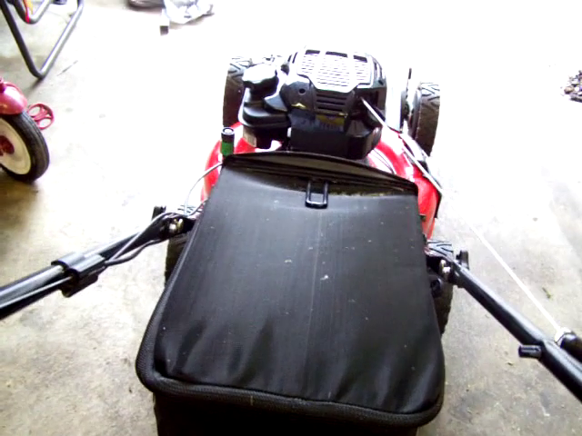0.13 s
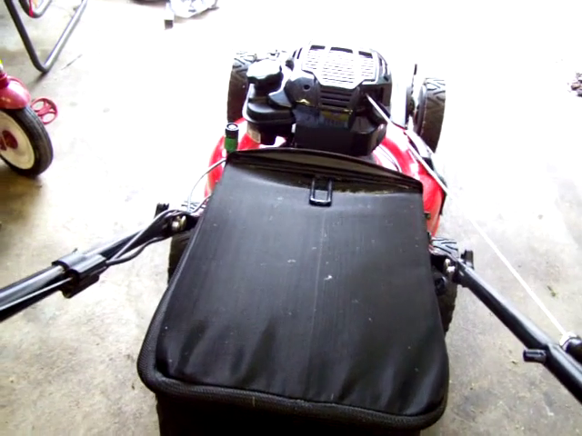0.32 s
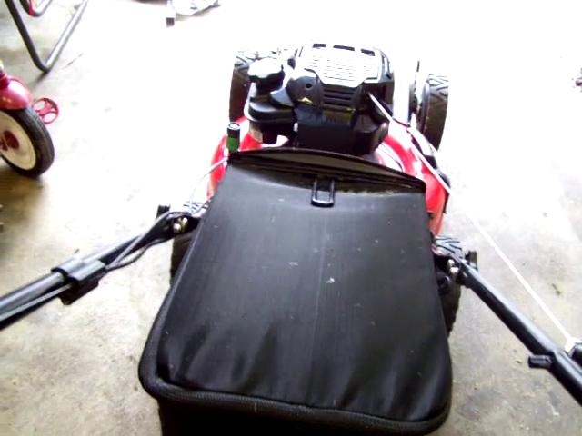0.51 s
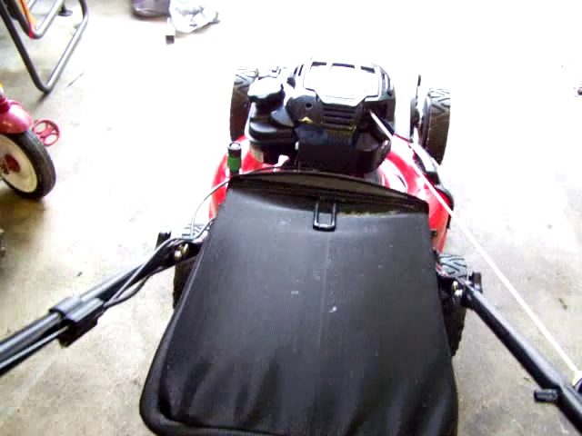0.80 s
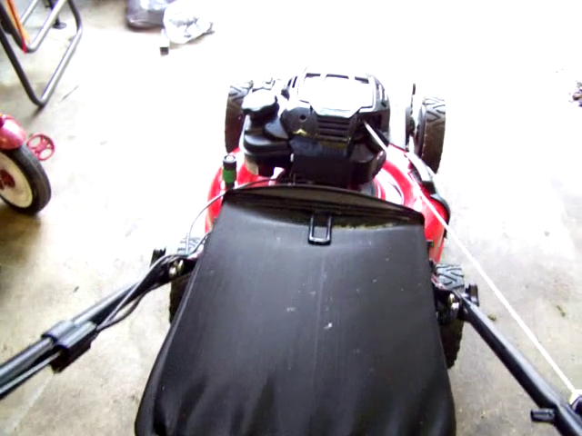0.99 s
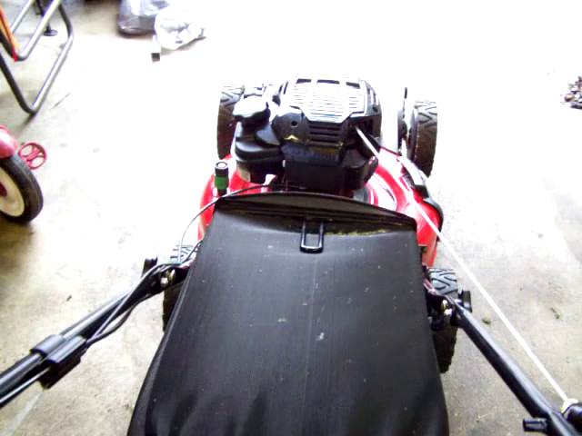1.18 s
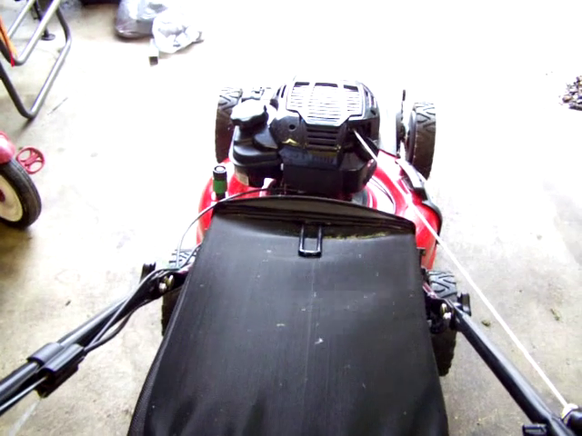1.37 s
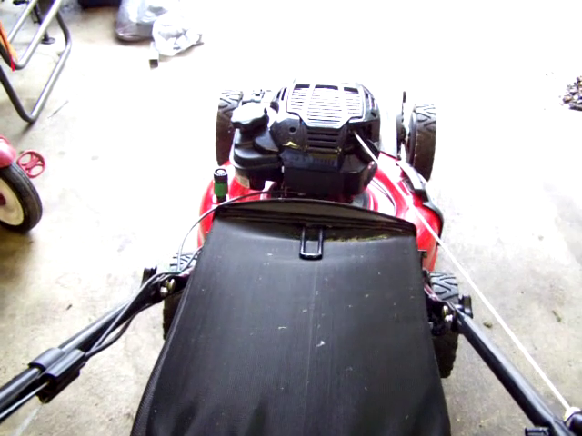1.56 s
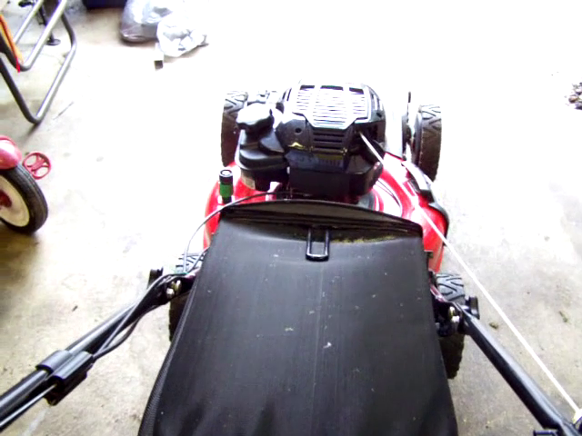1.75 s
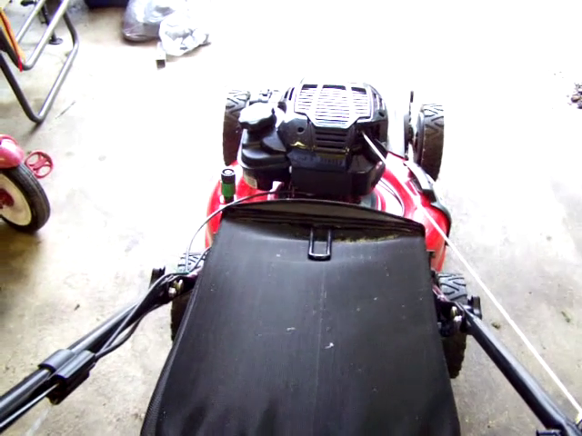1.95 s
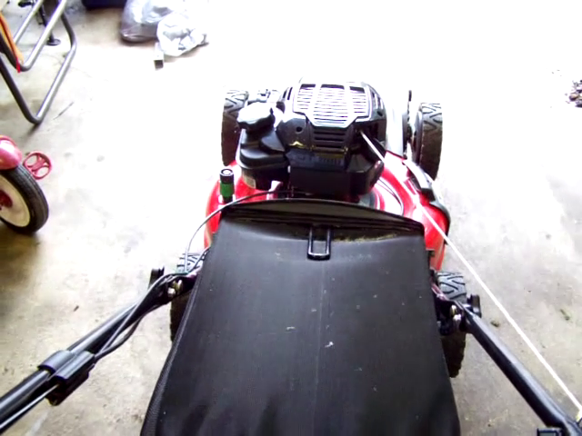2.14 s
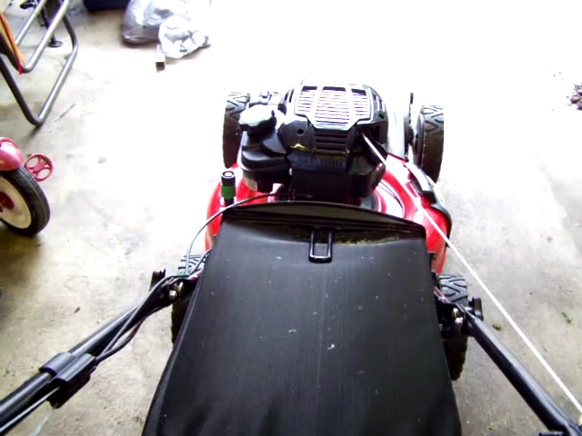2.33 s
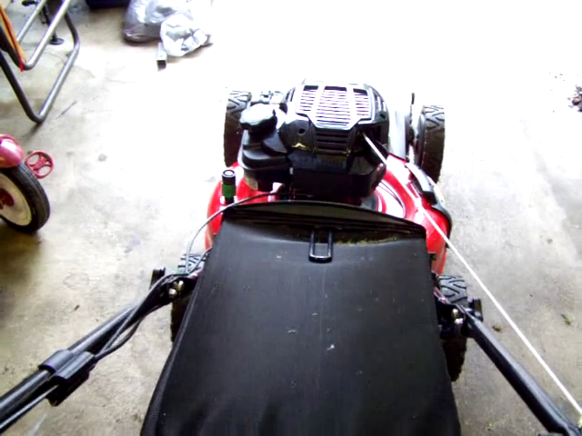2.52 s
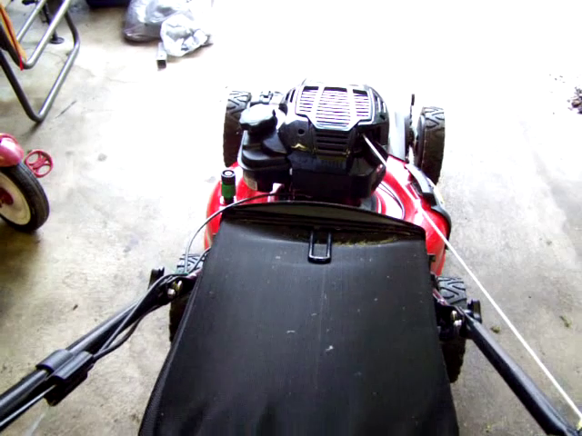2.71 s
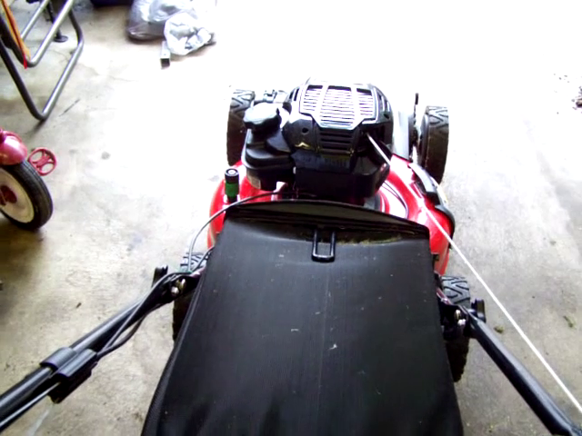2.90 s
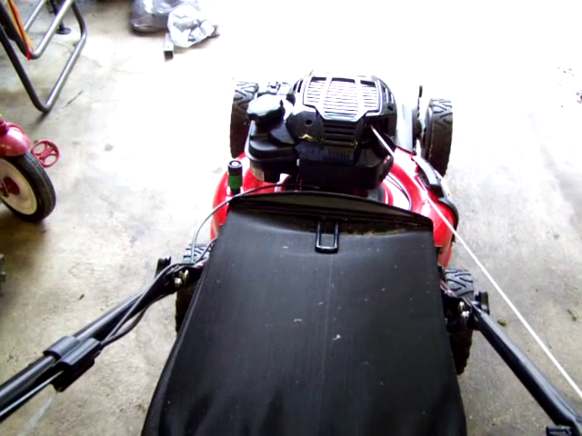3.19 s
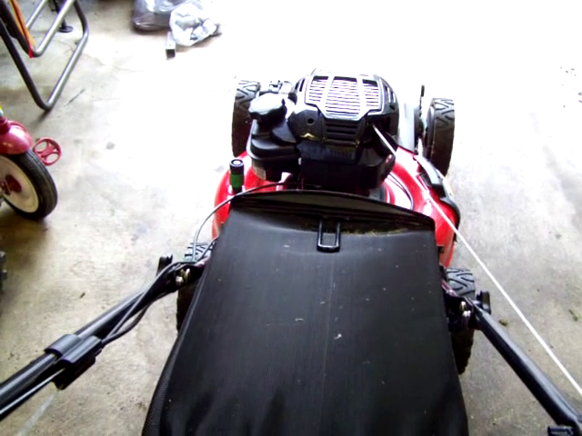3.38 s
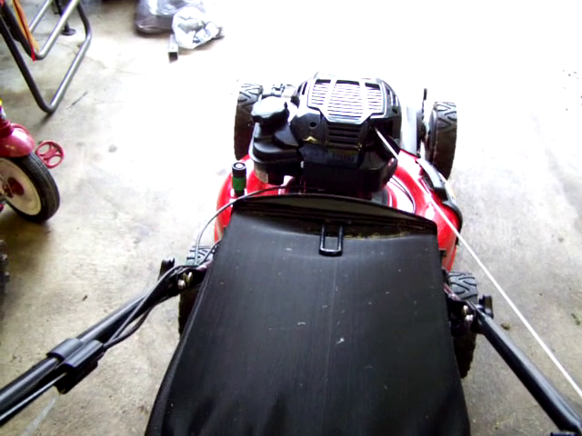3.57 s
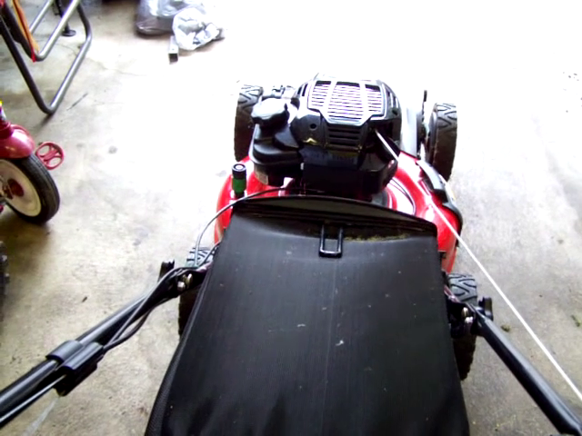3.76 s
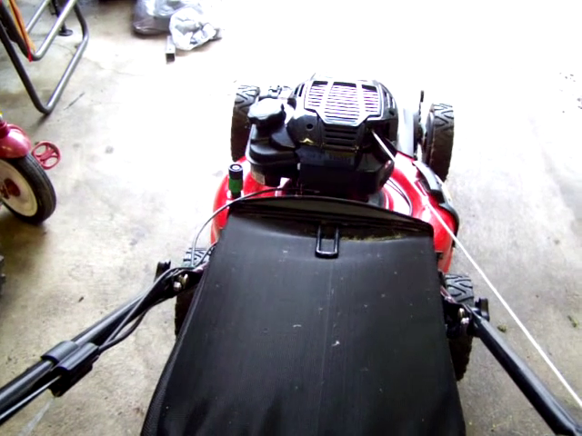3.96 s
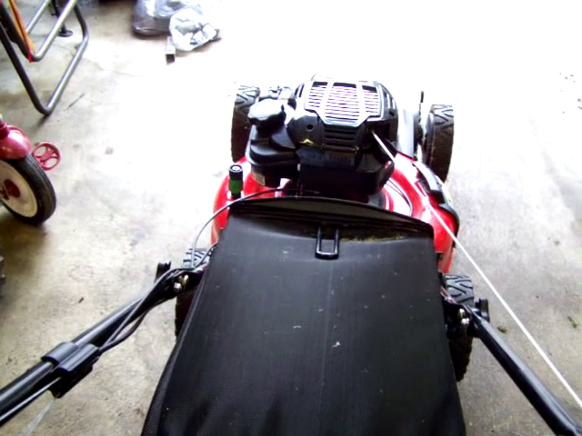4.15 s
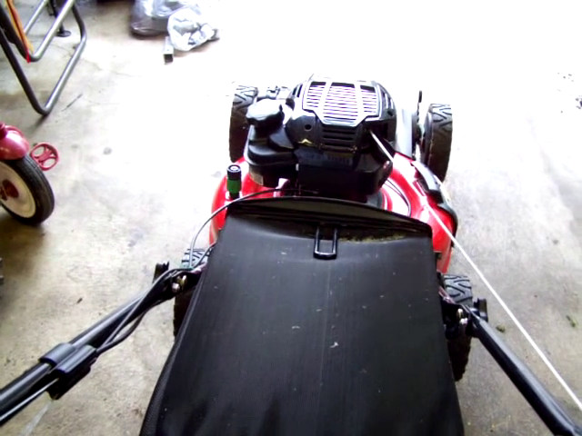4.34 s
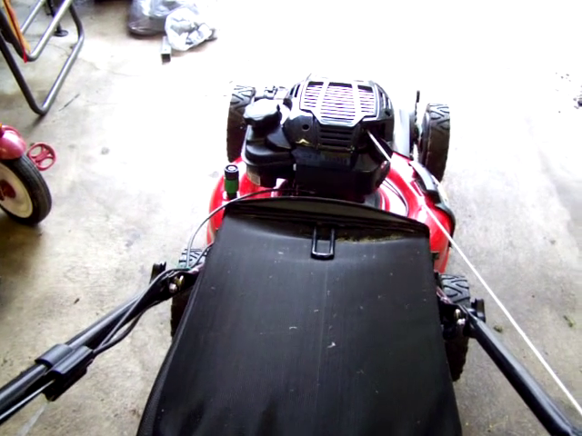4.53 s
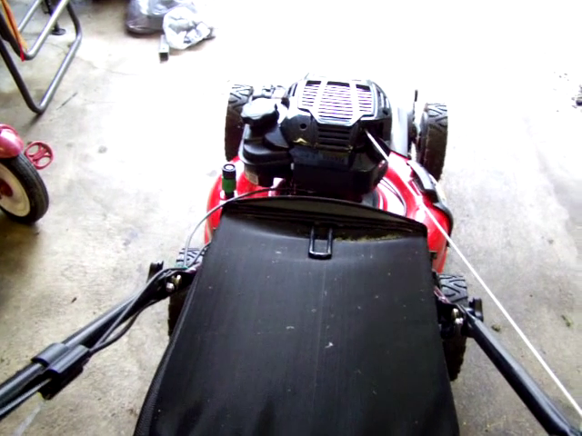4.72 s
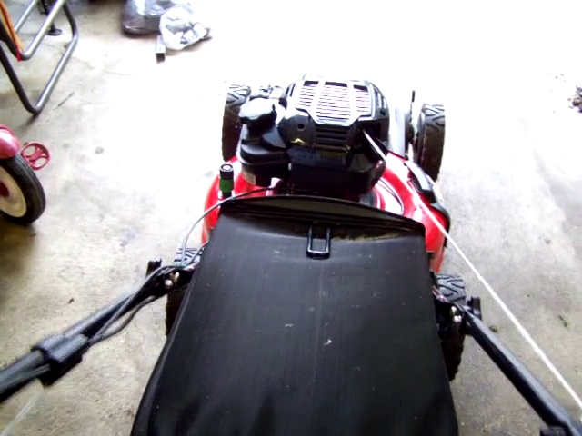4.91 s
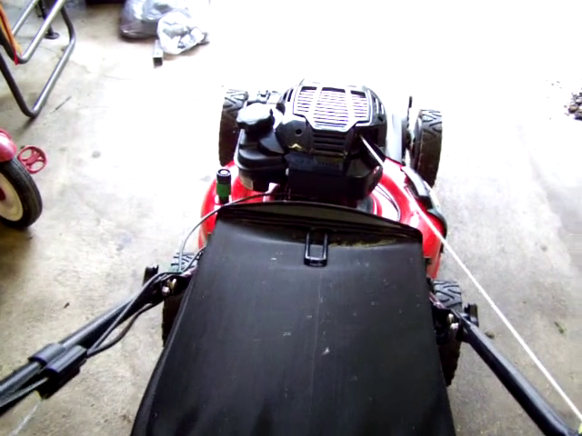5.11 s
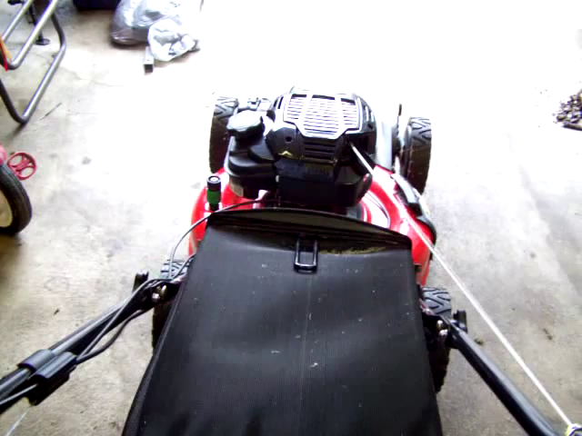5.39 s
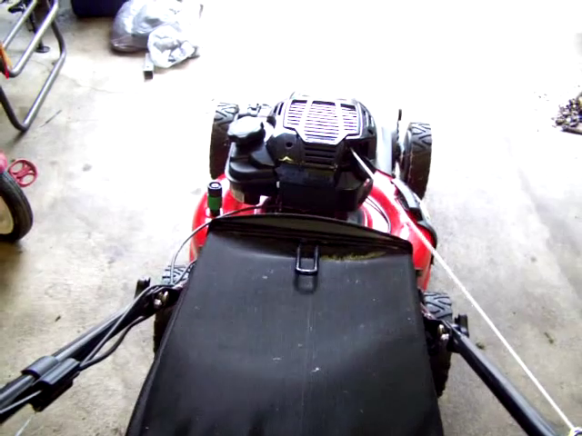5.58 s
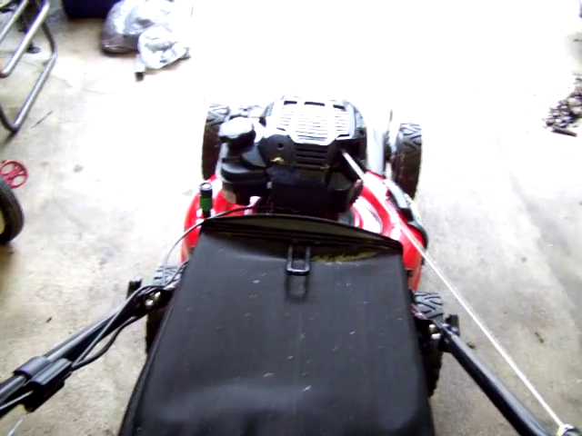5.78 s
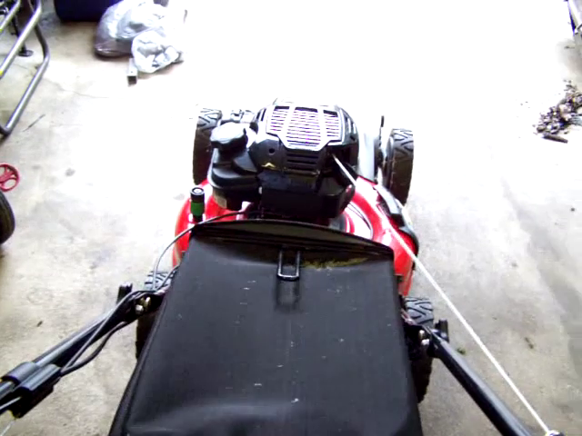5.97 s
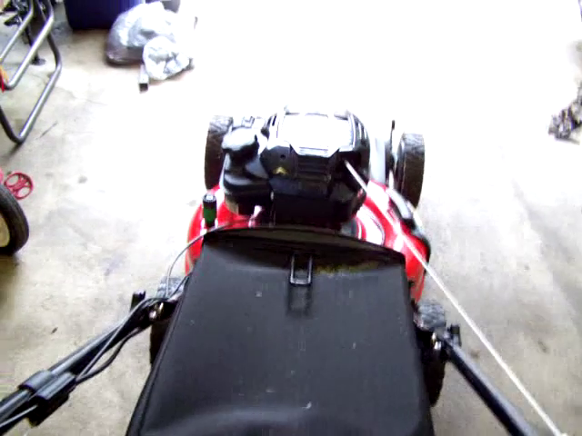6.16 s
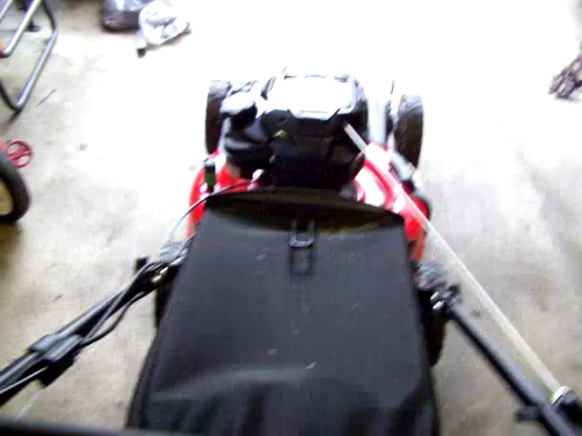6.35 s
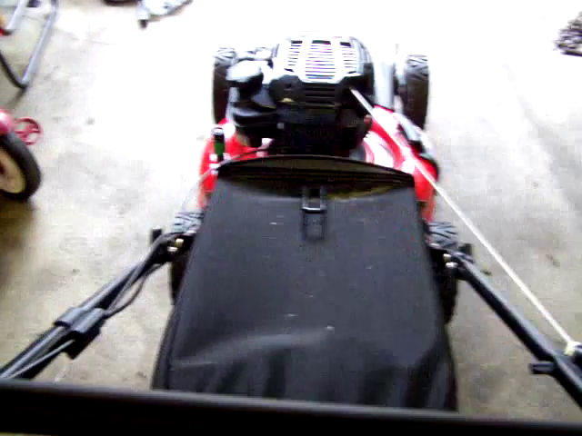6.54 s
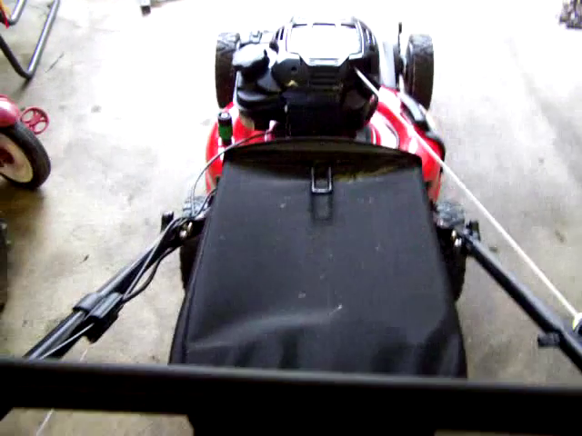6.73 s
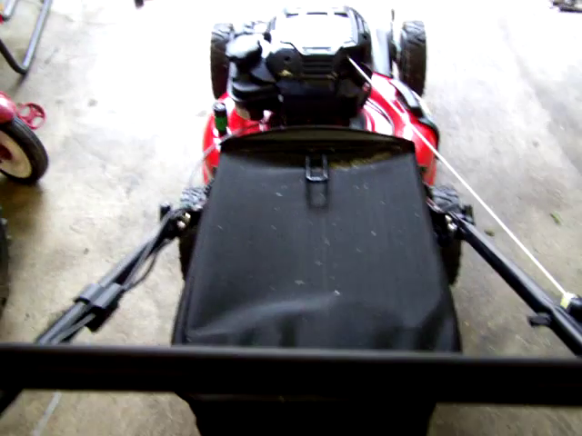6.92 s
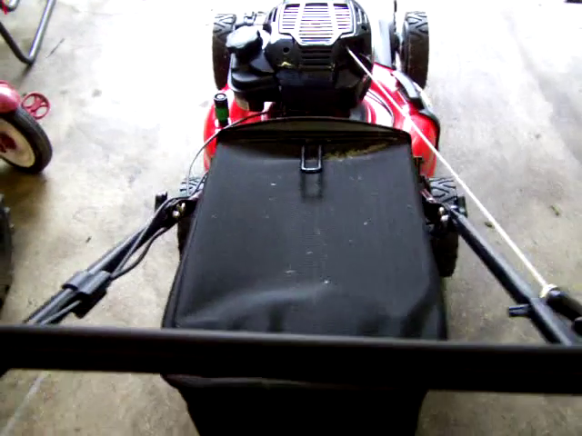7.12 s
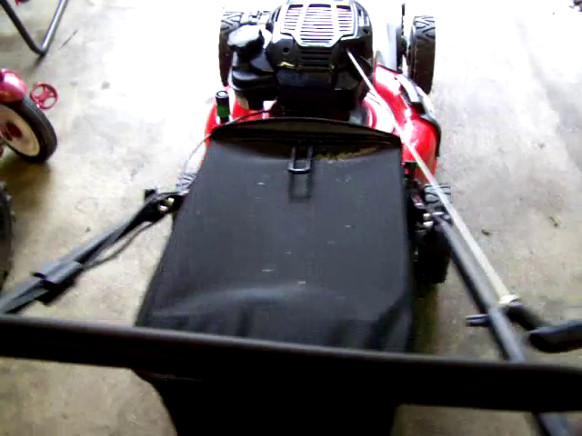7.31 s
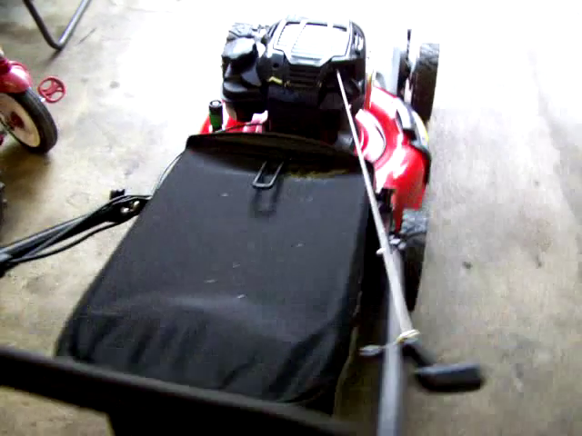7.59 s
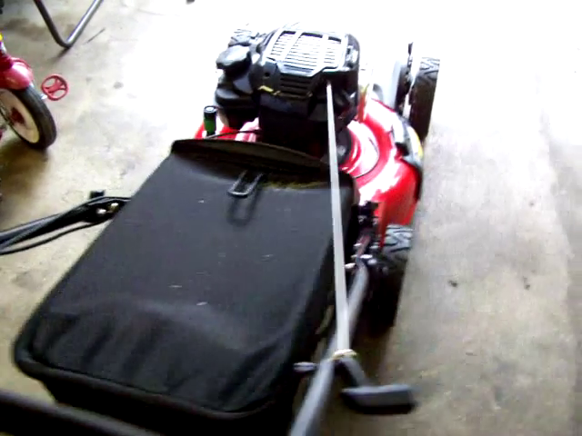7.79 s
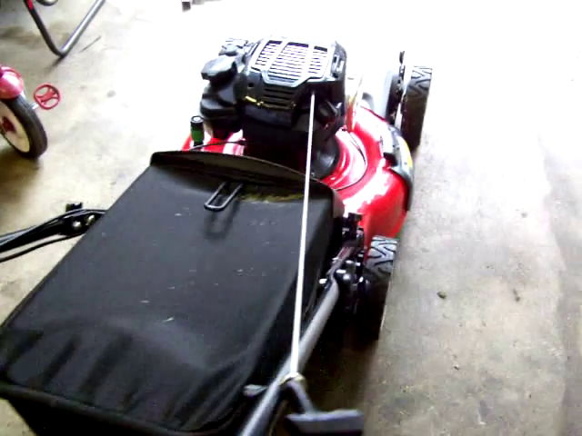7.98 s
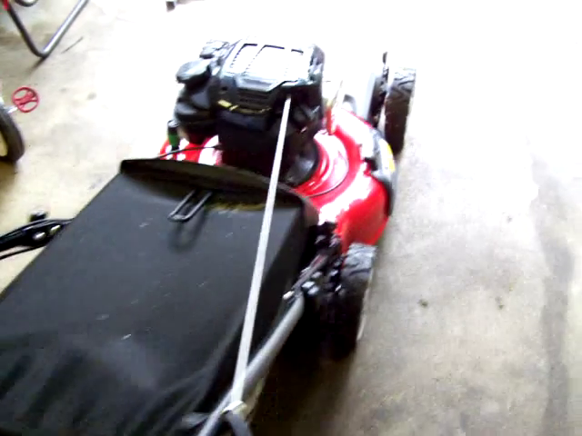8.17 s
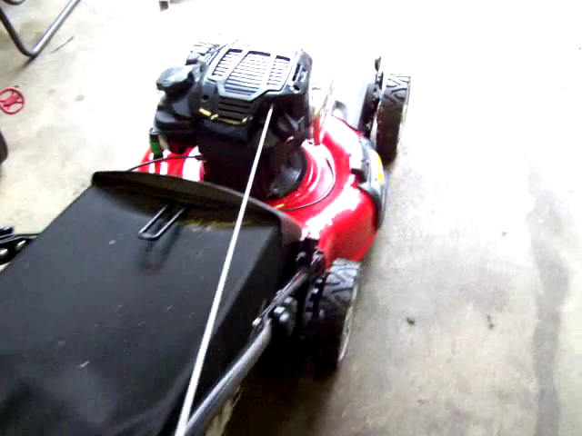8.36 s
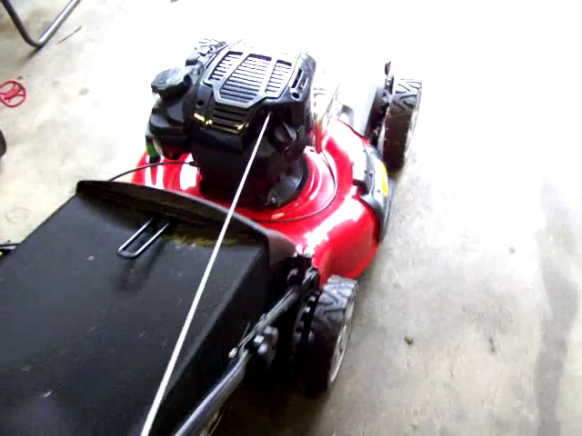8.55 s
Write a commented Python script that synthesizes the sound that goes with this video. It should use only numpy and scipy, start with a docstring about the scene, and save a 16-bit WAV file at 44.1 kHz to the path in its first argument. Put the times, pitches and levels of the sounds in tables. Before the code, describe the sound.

From 0 to about 4.95 seconds a small four-stroke petrol mower runs at constant speed in a hard-walled garage: a dense, buzzing drone with firing harmonics, bright valve clatter, metallic muffler rasp and blade air, wavering only slightly. At 4.96 the spark is cut and the loud drone vanishes almost at once. The pitch slides down as the brake bites; hollow deck rumble, loose rattling and airy rush slow, breaking into irregular chuffs and hissing puffs between 5.2 and 5.9, finished by 6.1. A low unsteady motor hum and soft hiss are left. Fingers begin rubbing the camera's case near 5.8; a very loud, clipped plastic knock hits at 6.07, followed by squeaky scuffs and small ticks until 6.8. More light contacts come near 6.95, a sharper pair of rubs at 7.14, quiet until another rub and knock around 8.05, then a faint slide and tick to the end at about 8.6.

```python
"""A single-cylinder four-stroke petrol mower runs in a garage, is switched off and coasts down in a few last chuffs.
The engine is exhaust harmonics under valve clatter, muffler rasp and blade gusts, all following the crank.
A motor hum (steady and wavering partials) and a soft hiss of shaped noise remain.
Fingers rub and knock on the case of the hand-held camera: friction and snaps beside the plastic's resonances."""
import sys
import numpy as np
from scipy import signal
from scipy.fft import rfft, irfft
from scipy.io import wavfile

SR = 44100
rng = np.random.default_rng(int(sys.argv[2]) if len(sys.argv) > 2 else 0)


def master_out(mix):
    """Clip the mix to full scale and print it as 16-bit PCM to the path in sys.argv[1]."""
    frames = np.transpose(np.atleast_2d(mix))
    ceiling = np.clip(frames, -1, 1)
    pcm = np.round(ceiling * 32767).astype(np.int16)
    wavfile.write(sys.argv[1], SR, pcm)


N = 379260
TIME = np.arange(N) / SR
IGNITION_OFF_S = 4.96

# relative spectrum of rattling loose parts: (frequency [Hz], level [dB])
RATTLE_SPECTRUM = [(600, -9), (1000, 0.5), (1500, 2.5), (2300, 0), (3000, -4), (5000, -9), (8000, -37)]


def from_db(db):
    """Decibels to gain."""
    return 10 ** (np.asarray(db) / 20)


def rms_one(x):
    """Scale to unit rms."""
    return x / np.sqrt(np.mean(x ** 2) + 1e-20)


def in_time(rows):
    """Each column of an automation curve, joined by straight lines."""
    s, *columns = np.transpose(rows)
    return [np.interp(TIME, s, column) for column in columns]


def colour(x, spectrum):
    """Filter a sound as the parts that radiate it do, with weak bass below the first point; rms 1."""
    hz, db = np.transpose(spectrum)
    bins = np.maximum(np.fft.rfftfreq(N, 1 / SR), 1)
    bass_cut = np.minimum(bins / hz[0], 1) ** 2
    gain = from_db(np.interp(np.log(bins), np.log(hz), db))
    return rms_one(irfft(rfft(x) * bass_cut * gain, N))


def noise(spectrum):
    """Turbulence: white noise coloured by a given spectrum; rms 1."""
    return colour(rng.standard_normal(N), spectrum)


def drift(rate):
    """Smooth random wander, changing about rate times a second; rms 1."""
    bins = np.fft.rfftfreq(N, 1 / SR)
    return rms_one(irfft(rfft(rng.standard_normal(N)) / (1 + (bins / rate) ** 4), N))


def resonate(x, hz, width_hz):
    """One resonance with gain 1 at its peak."""
    r = np.exp(-np.pi * width_hz / SR)
    feedforward = np.array([1, 0, -1]) * (1 - r * r) / 2
    feedback = [1, -2 * r * np.cos(2 * np.pi * hz / SR), r * r]
    return signal.lfilter(feedforward, feedback, x + 1e-18)


def fade_after(s, length_s):
    """Gain of 1 before the given time, then a straight fade to 0."""
    return np.clip((s - TIME) / length_s + 1, 0, 1)


def crank_speed():
    """Turns per second: held by a governor that hunts a little, then braked evenly to a stop."""
    # governed speed: (time [s], crank speed [turns/s])
    governor_curve = [(0.7, 52.6), (1.4, 52.82), (1.9, 52.72), (2.6, 52.92), (3.2, 52.68)]
    brake_turns_per_s2 = 53
    governed, = in_time(governor_curve)
    return np.maximum(governed - brake_turns_per_s2 * np.maximum(TIME - IGNITION_OFF_S, 0), 0)


def power_left():
    """Amplitude share of the running sound: 1 until the spark is cut, then quickly 0."""
    return np.sqrt(fade_after(IGNITION_OFF_S, 0.031))


def engine_tones(cycles, waver, waver_per_order, scatter):
    """Harmonics of one exhaust pulse per firing; uneven combustion shakes the high ones most."""
    # exhaust and blade tones: (multiple of the firing rate, relative level [dB])
    harmonics = [(2, -26), (3, -25.5), (4, -14), (5, -11.5), (6, -3.5), (8, 0), (9, -14.5), (10, -9.5),
                 (11, -12), (12, -18), (14, -8), (15, -21), (16, -11), (17, -11), (18, -11), (20, -10.5),
                 (24, -4), (28, -4), (29, -11), (32, -16), (36, -9), (46, -8), (52, -11.5)]
    out = np.zeros(N)
    for order, db in harmonics:
        shake = (waver + waver_per_order * order) * (drift(6) + 1j * drift(3.9))
        # the walls smear the pulse: a fixed lag in turns of this harmonic
        lag = scatter * rng.uniform(-0.98, 1) * order
        tone = np.exp(2j * np.pi * (order * cycles + lag))
        out += from_db(db) * np.real((1 + shake) * tone)
    return out


def garage(x, t60, wet_db):
    """Direct sound and a dense, exponentially decaying tail from bare walls."""
    t = TIME[:SR // 2]
    tail = rng.standard_normal(len(t)) * from_db(-60 * t / t60)
    return x + from_db(wet_db) * signal.fftconvolve(x, tail / np.linalg.norm(tail))[:N]


def clatter(cycles, jitter_s, uneven_db):
    """Piston and valves knock once in each of the four strokes, each with its own bright ring."""
    out = np.zeros(N)
    for stroke in range(4):
        at = np.flatnonzero(np.diff(np.floor(cycles - stroke / 4)) > 0)
        late, strength = rng.standard_normal((len(at), 2)).T
        struck = np.clip(at + (late * jitter_s * SR).astype(int), 0, N - 1)
        clicks = np.zeros(N)
        clicks[struck] = from_db(uneven_db * strength)
        out += garage(clicks, t60=.12, wet_db=13.5)
    bright = signal.butter(2, 1300, "high", fs=SR, output="sos")
    return rms_one(signal.sosfilt(bright, out))


def blade_air(cycles, depth, uneven_db):
    """Air rushes in a gust each time a blade tip passes the chute, four times a firing cycle."""
    gust = 1 + depth * np.cos(2 * np.pi * 4 * cycles)
    return rms_one(rng.standard_normal(N) * gust * from_db(uneven_db * drift(40)))


def muffler_rasp(cycles, depth, swell_db):
    """Each exhaust blast sets the muffler shell rasping, now more, now less."""
    # shell modes: (frequency [Hz], width [Hz], relative level [dB])
    shell_modes = [(499, 36, -2), (1184, 220, -1), (1375, 100, 1), (1480, 50, 0)]
    blast = rng.standard_normal(N) * (1 + depth * np.cos(2 * np.pi * cycles))
    shell = np.zeros(N)
    for k, (hz, width, db) in enumerate(shell_modes):
        swelling = blast * from_db(swell_db * drift(11))  # each mode swells on its own
        shell += (-1) ** k * from_db(db) * resonate(swelling, hz, width)
    return rms_one(shell)


def running_mower(cycles):
    """Exhaust tones under clatter, rasp and blade noise, until the spark is cut."""
    # relative spectrum of clatter and blade noise under power: (frequency [Hz], level [dB])
    machine_spectrum = [(25, -26), (90, -17.5), (200, -8), (330, -7), (480, -2), (880, -2.5), (1200, -0.5),
                        (1480, 0), (1650, -1.5), (2800, -2.5), (4050, 3), (4900, -4.5), (5900, -10.5),
                        (7600, -22)]
    air = blade_air(cycles, depth=0.14, uneven_db=0.7)
    machine = air + from_db(-3) * clatter(cycles, jitter_s=.00016, uneven_db=0.5)
    machine = from_db(-17.5) * colour(machine, machine_spectrum)
    rasp = from_db(-28.0) * muffler_rasp(cycles, depth=.3, swell_db=2.7)
    tones = from_db(-27) * engine_tones(cycles, waver=0.016, waver_per_order=0.0092, scatter=.035)
    return (machine + rasp + tones) * power_left()


def background():
    """A motor hums over a soft hiss; both come forward as the mower stops."""
    # hum partials: (frequency [Hz], relative level [dB], unsteadiness [0-1])
    hum_partials = [(63, -40.5, 0), (117.8, -38, 0), (124.4, -42.5, 0.6), (130, -47.5, 0.4),
                    (159.6, -45.5, .4), (244.4, -34, 0.02), (305, -45, 0.2), (368, -59, 0.2), (487, -43, 0),
                    (550, -50, 0.1), (614, -53, 0.1), (670, -46.5, 0)]
    # relative spectrum of the hiss: (frequency [Hz], level [dB])
    air_spectrum = [(35, -18), (60, -3), (130, -3.5), (200, -4.5), (370, -5), (600, -7.5), (1000, -5),
                    (2300, -6.5), (2800, -3.5), (3400, -1), (4300, -8), (5200, -17), (6500, -22.5),
                    (8000, -31)]
    # layer gains: (time [s], hum gain [dB], hiss gain [dB])
    layer_gains = [(4.95, -23, -41), (5.6, 1, -27), (6.7, 2, -28.3), (7.9, -0.5, -27), (8.6, -3.5, -27)]
    hum_db, hiss_db = in_time(layer_gains)
    hum = np.zeros(N)
    for hz, db, unsteady in hum_partials:
        waver = 1 + unsteady * (drift(4) + 1j * drift(4))
        tone = np.exp(2j * np.pi * (hz * TIME + rng.random()))
        hum += from_db(db) * np.real(waver * tone)
    return from_db(hum_db) * hum + from_db(hiss_db) * noise(air_spectrum)


def winding_down(slowed, fall):
    """Gain of a coasting noise; slowed is 0 at full speed and 1 at standstill."""
    full_db, lost_db, dies_s, over_s = fall
    return from_db(full_db - lost_db * slowed) * fade_after(dies_s, over_s)


def deck_rumble(cycles):
    """Gusts from the slowing blade boom in the hollows of the deck, over a low rumble."""
    # cutting deck and grass bag modes: (frequency [Hz], width [Hz], relative level [dB])
    deck_modes = [(68, 19, 4), (172, 29, 6.5), (245, 41, -3), (352, 50, 0), (470, 67, 4), (725, 160, -5)]
    # relative spectrum of the rumble: (frequency [Hz], level [dB])
    rumble_spectrum = [(40, -19), (80, -3), (200, -7), (600, -3), (900, -7), (1300, -17), (2400, -44)]
    gusts = blade_air(cycles, depth=0.36, uneven_db=0.5)
    boom = np.zeros(N)
    for k, (hz, width, db) in enumerate(deck_modes):
        boom += (-1) ** k * from_db(db) * resonate(gusts, hz, width)
    boom = colour(boom, [(45, -5.0), (800, 6), (2400, -26)])
    return rms_one(boom + from_db(-6.5) * noise(rumble_spectrum))


def coasting_mower(cycles, slowed):
    """The blade's tones sink, the deck rumbles and loose parts rattle as the brake slows the crank."""
    # blade tones: (multiple of the firing rate, relative level [dB])
    blade_tones = [(3, -15), (8, -9), (12, -7), (20, -7)]
    # relative spectrum of the rushing air: (frequency [Hz], level [dB])
    rush_spectrum = [(1500, -26), (2800, -8.5), (3900, 0.5), (4700, -10), (6000, -14.5), (8000, -28.5)]
    # fall of each noise:
    # (gain at full speed [dB], loss by standstill [dB], fade start [s], fade length [s])
    rumble_fall = (-21.5, 1, 5.72, 0.085)
    rattle_fall = (-20.5, 6, 6, 0.085)
    rush_fall = (-20, 6, 5.95, 0.06)

    spinning = fade_after(5.25, 0.098)  # clear tones give way to rumble
    blade = np.zeros(N)
    for order, db in blade_tones:
        tone = np.sin(2 * np.pi * (order * cycles + rng.random()))
        blade += from_db(db + 2 * drift(8.2)) * tone
    rumble = (1 - .25 * spinning) * deck_rumble(cycles) + blade * spinning

    air = blade_air(cycles, depth=0.14, uneven_db=1.5)
    loose = air + .5 * clatter(cycles, jitter_s=.001, uneven_db=4.0)
    rattle = colour(loose, RATTLE_SPECTRUM)

    sound = winding_down(slowed, rumble_fall) * rumble
    sound += winding_down(slowed, rattle_fall) * rattle
    sound += winding_down(slowed, rush_fall) * noise(rush_spectrum)
    return sound * np.sqrt(1 - power_left() ** 2)  # equal-power crossfade from the running sound


def last_strokes():
    """Unburnt charges leave the muffler as separate chuffs; each hisses at the valve and shakes the loose parts."""
    # last compression strokes: (time [s], chuff gain [dB], hiss gain [dB], rattle gain [dB])
    strokes = [(5.235, -25, -38, -32), (5.32, -24, -35, -30), (5.385, -20, -27, -20),
               (5.454, -20.5, -23, -30), (5.535, -17.5, -19.5, -29), (5.64, -21, -17, -24),
               (5.69, -23, -26, -24), (5.732, -18, -26, -26), (5.80, -31, -22.5, -29),
               (5.908, -27.5, -22, -26)]
    # relative spectra: (frequency [Hz], level [dB])
    chuff_spectrum = [(40, -20), (80, -7), (130, -9), (170, 3.5), (260, -7), (480, -6.5), (800, -15.5),
                      (2000, -43)]
    valve_spectrum = [(1000, -16), (1600, 9), (3000, 3), (5000, 2), (7200, -0.5), (8000, -21)]
    rise_s, decay_s = 0.0096, 0.026  # time constants
    chuff, hiss, rattle = np.zeros((3, N))
    for s, chuff_db, hiss_db, rattle_db in strokes:
        puff = np.exp(-np.maximum((s - TIME) / rise_s, (TIME - s) / decay_s).clip(0, 50))
        chuff += from_db(chuff_db) * puff
        hiss += from_db(hiss_db) * puff
        rattle += from_db(rattle_db) * puff
    return chuff * noise(chuff_spectrum) + hiss * noise(valve_spectrum) + rattle * noise(RATTLE_SPECTRUM)


def case_ring(force, grip):
    """The camera's plastic case, driven by a force on its skin; a tight grip favours the higher mode."""
    # case modes: (frequency [Hz], width [Hz], loose-grip level [dB], tight-grip level [dB])
    case_modes = [(1530, 480, -11.5, -11.5), (2060, 112, 4.5, -3.5), (2287, 172, -0.5, 3),
                  (2960, 710, -13.5, -7), (3750, 370, -9, -7.5), (5170, 1000, -21.5, -16.5),
                  (7340, 520, -33, -28)]
    ring = 0
    for k, (hz, width, loose_db, tight_db) in enumerate(case_modes):
        mode_db = loose_db + grip * (tight_db - loose_db)
        ring = ring + (-1) ** k * from_db(mode_db) * resonate(force, hz, width)
    return ring


def slide(start_s, length_s):
    """Pressure of one finger slide: swell, hold, quick release."""
    swell_share, release_s = 0.41, 0.007  # share of the slide's length; time constant
    swell = np.clip((TIME - start_s) / (swell_share * length_s), 0, 1)
    return swell * np.exp(-np.clip((TIME - start_s - length_s) / release_s, 0, 20))


def finger_rub(slips_per_s, slip_db):
    """Skin sticks and slips on the case: uneven jerks over steady friction; the strongest slide sets the grip."""
    # finger slides:
    # (start [s], length [s], case ring gain [dB], dry scuff gain [dB], grip [0 loose - 1 tight])
    slides = [(5.787, .045, -22.5, -29, .25), (5.862, .07, -22.5, -38, .15), (5.92, .075, -25.5, -34, .55),
              (6.17, .09, -31, -48, .4), (6.25, .06, -26, -39, .5), (6.265, .175, -19.5, -33, .59),
              (6.39, .11, -21, -38, .65), (6.494, 0.039, -18.5, -32, .59), (6.612, .016, -26, -28, .59),
              (6.62, .21, -37.5, -36, .59), (6.898, .075, -35, -38, .59), (6.995, .028, -24.5, -46, .59),
              (7.085, .05, -26, -40, .25), (7.133, 0.02, -14, -36, .17), (7.151, .022, -20, -19.5, .6),
              (8.026, 0.056, -27, -32, .1), (8.059, .058, -17, -34, .1), (8.27, .32, -37, -49, .3)]
    # relative spectrum of dry skin on the case: (frequency [Hz], level [dB])
    scuff_spectrum = [(1500, 1), (3500, 14), (5400, 9), (7500, 0), (8200, -28)]
    rubbing, scuffing, grip = np.zeros((3, N))
    for start_s, length_s, ring_db, scuff_db, tightness in slides:
        pressure = slide(start_s, length_s)
        ring = from_db(ring_db) * pressure
        grip = np.where(ring > rubbing, np.clip(tightness, 0, 1), grip)
        rubbing = np.maximum(rubbing, ring)
        scuffing = np.maximum(scuffing, from_db(scuff_db) * pressure)
    # one jerk each time the travel passes a whole number
    travel = np.cumsum(slips_per_s * from_db(3 * drift(80))) / SR
    slips = np.diff(np.floor(travel), prepend=0) * from_db(2.2 * drift(60))
    friction = rng.standard_normal(N) + from_db(slip_db) * rms_one(slips)
    return rubbing * rms_one(case_ring(friction, grip)) + scuffing * noise(scuff_spectrum)


def knocks():
    """Each row is a short snap and a ring of the case; the first three rows, within 2.1 ms, make one hard knock."""
    # snaps and rings: (time [s], case ring peak [dB], snap peak [dB], snap frequency [Hz],
    # snap width [Hz], grip [0 loose - 1 tight])
    contacts = [(6.0706, -2, 8.5, 3120, 283, .3), (6.0713, 0, 4, 1730, 200, .3),
                (6.0727, -18, 2.5, 2500, 130, .3), (6.189, -12, -13, 2200, 110, .4),
                (6.241, -13, -20, 3900, 800, .45), (6.252, -20, 1.5, 3950, 750, .45),
                (6.351, -11, -16, 1400, 300, .55), (6.9612, -11.5, -17, 4200, 1200, .6),
                (6.970, -12, -24, 2900, 500, .6), (7.139, -12, -17.5, 880, 70, .17),
                (7.151, -12, -9, 1550, 150, .3), (8.09, -10, -21, 796, 100, .1),
                (8.402, -16, -28, 2900, 500, .2)]
    out = np.zeros(N)
    click = signal.unit_impulse(SR // 10)
    for s, ring_db, snap_db, hz, width, grip in contacts:
        at = round(s * SR)
        ring = case_ring(click, np.clip(grip, 0, 1))
        snap = resonate(click, hz, width)
        contact = from_db(ring_db) * ring / ring.max() + from_db(snap_db) * snap / snap.max()
        out[at:at + len(click)] += contact
    return out


def scene():
    """The mower, what remains after it, and the hand on the camera."""
    turns_per_s = crank_speed()
    cycles = np.cumsum(turns_per_s) / SR / 2  # one firing every second turn
    slowed = 1 - turns_per_s / turns_per_s.max()
    mower = running_mower(cycles) + coasting_mower(cycles, slowed) + last_strokes()
    hand = finger_rub(slips_per_s=125, slip_db=-8.5) + knocks()
    return (mower + background() + hand)[None]


def record(dry):
    """Overload clips the loudest peaks, as in the hard knock; a steep low-pass cuts the top."""
    cutoff_hz = 8145
    clipped = np.clip(dry, -.92, .92)
    low_pass = signal.ellip(12, .2, 90, cutoff_hz, fs=SR, output="sos")
    return signal.sosfilt(low_pass, clipped)


dry = scene()
out = record(dry)
master_out(out)
```